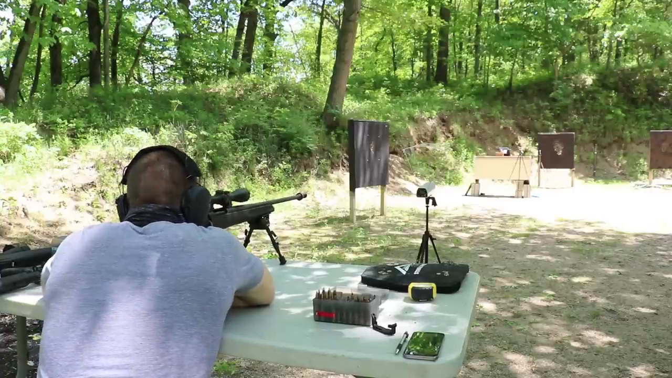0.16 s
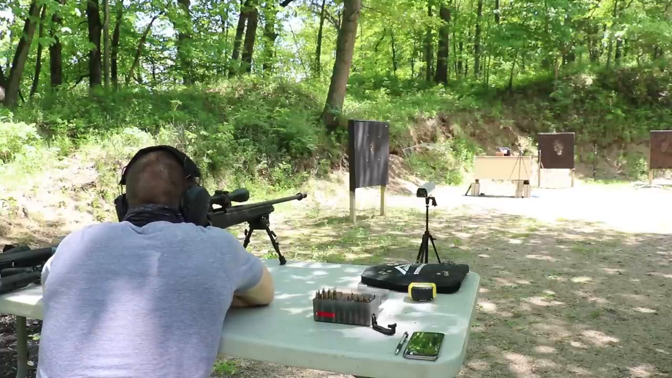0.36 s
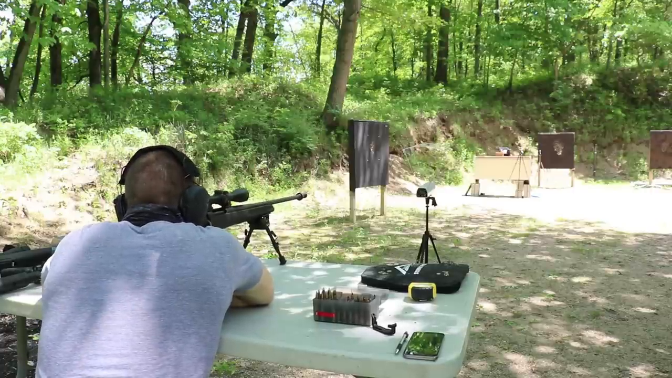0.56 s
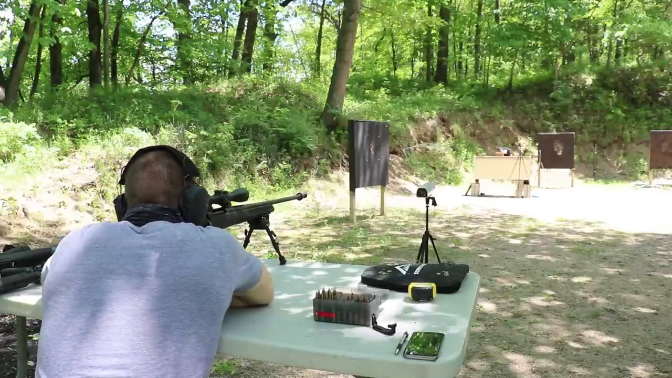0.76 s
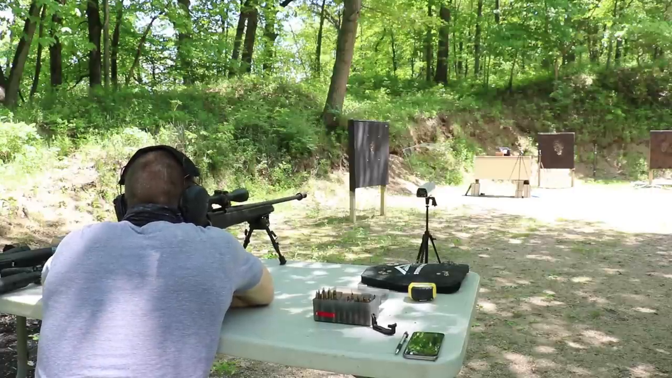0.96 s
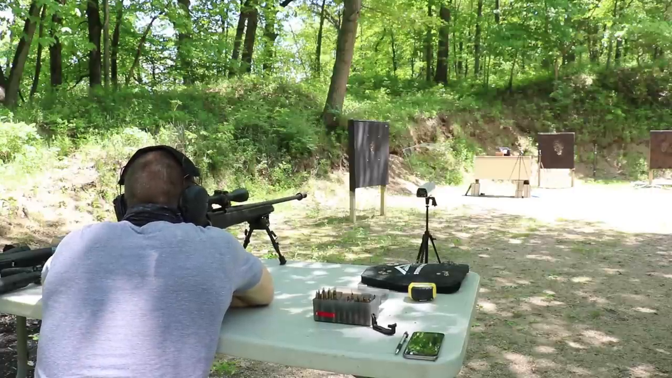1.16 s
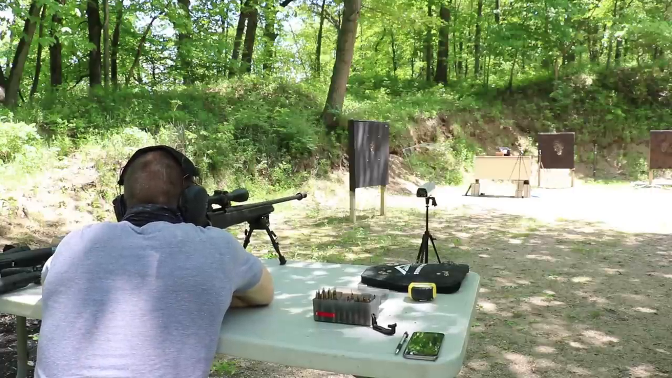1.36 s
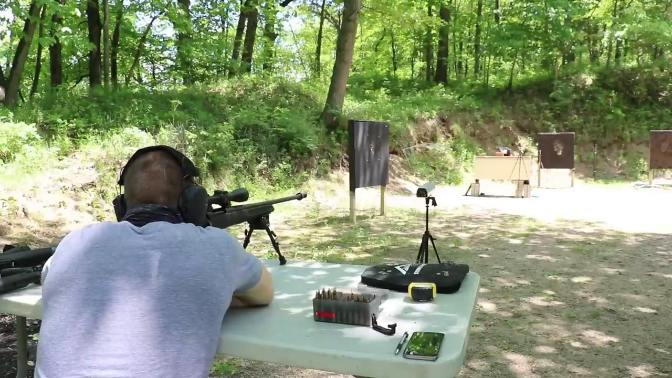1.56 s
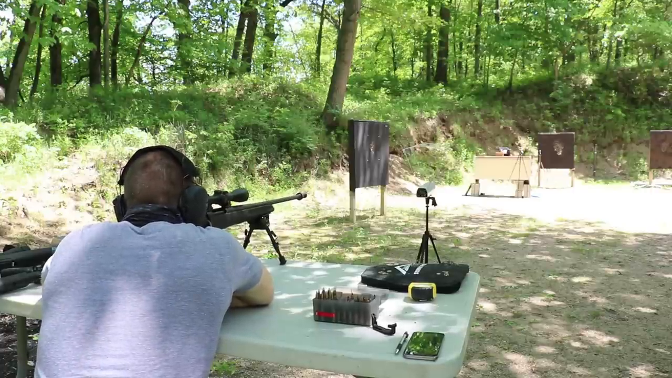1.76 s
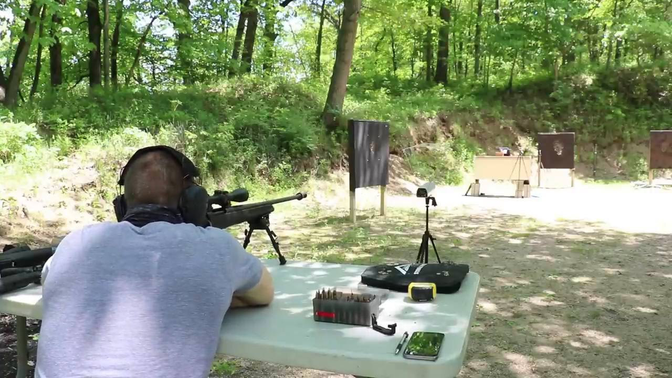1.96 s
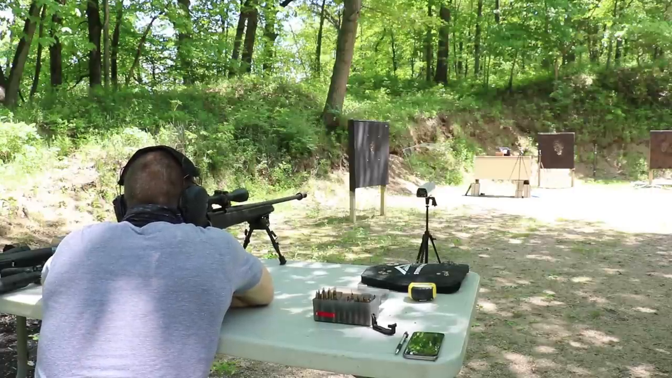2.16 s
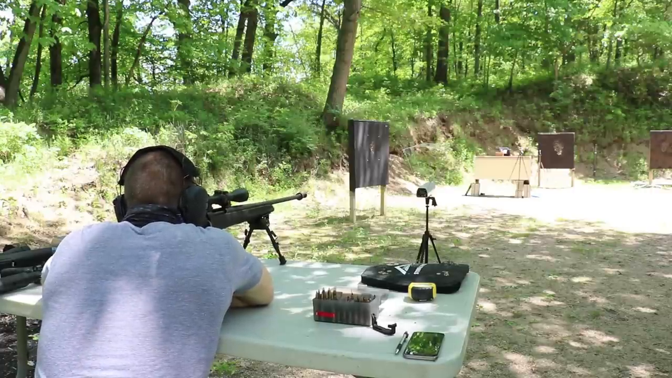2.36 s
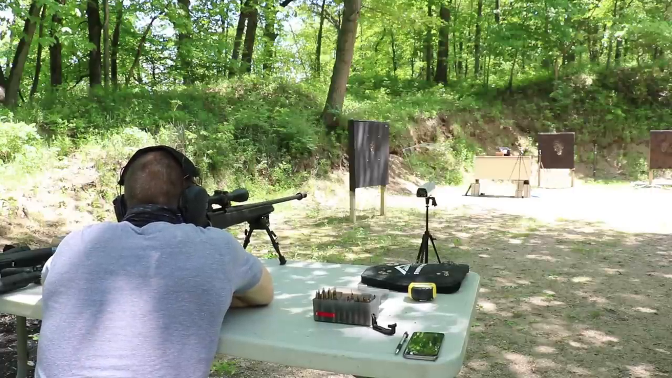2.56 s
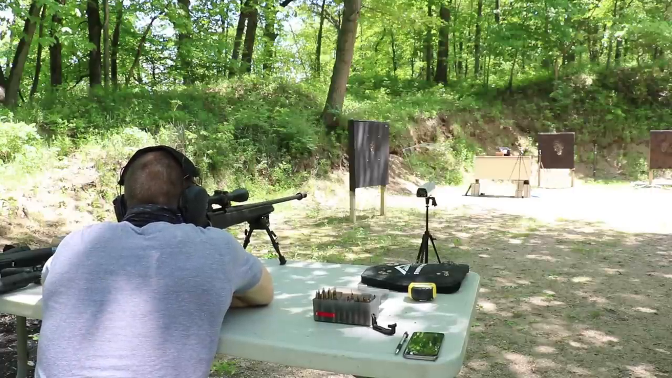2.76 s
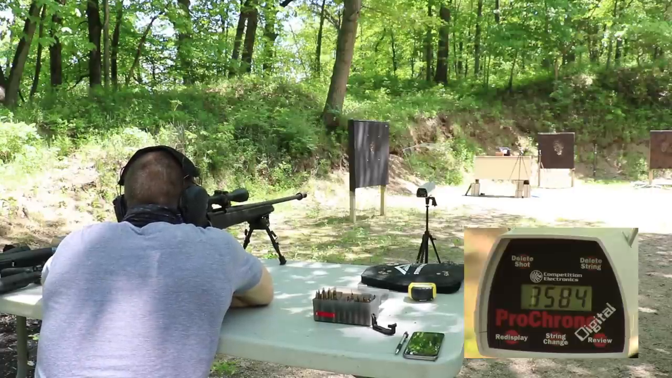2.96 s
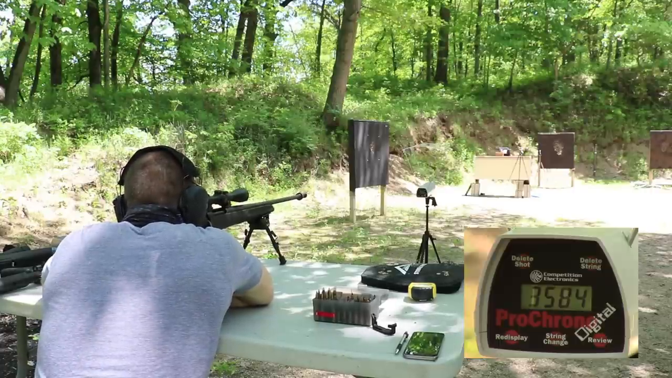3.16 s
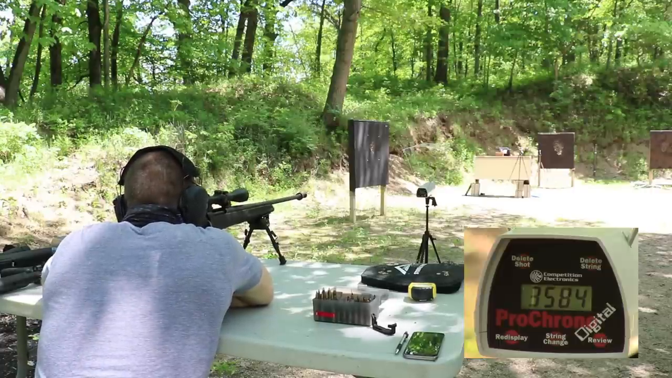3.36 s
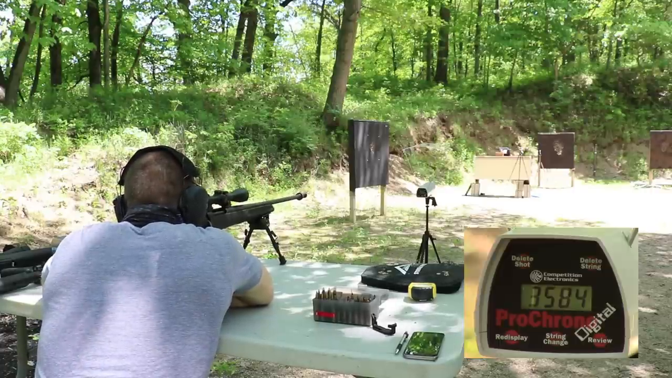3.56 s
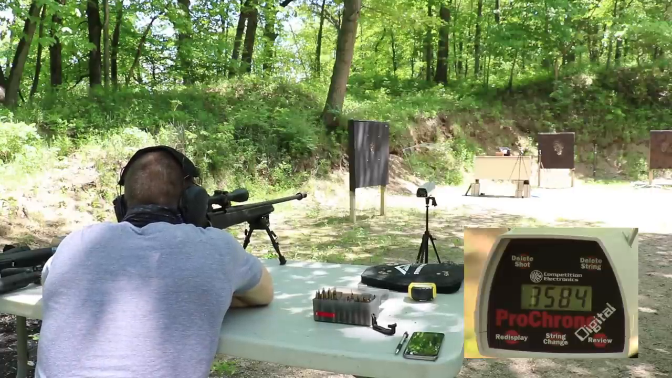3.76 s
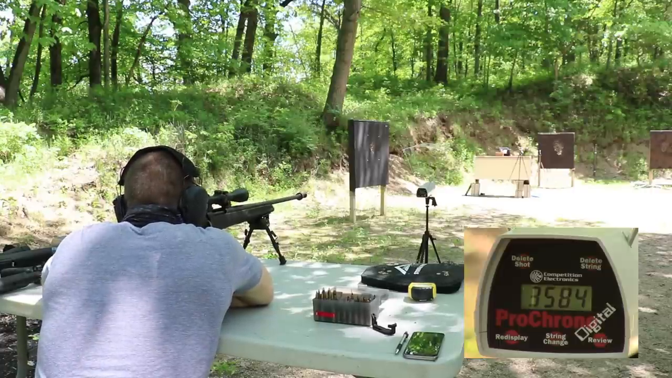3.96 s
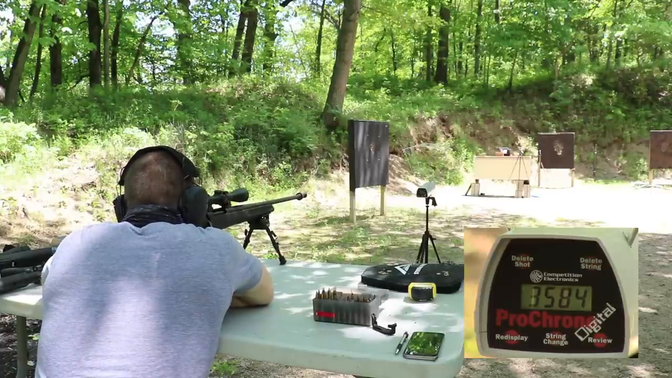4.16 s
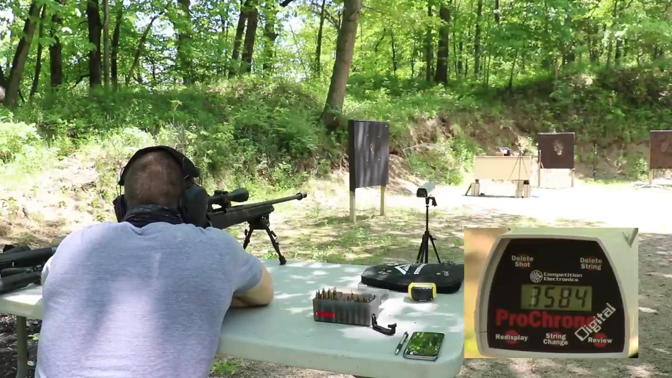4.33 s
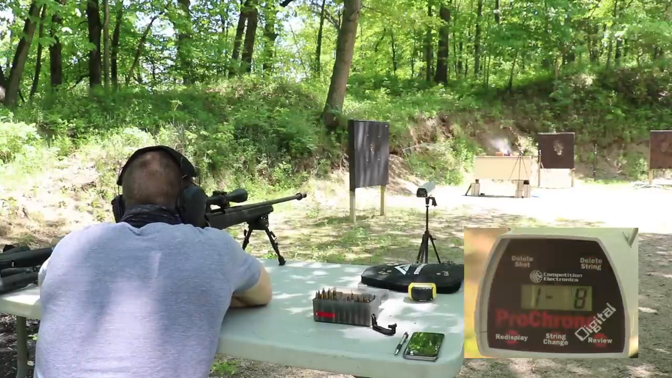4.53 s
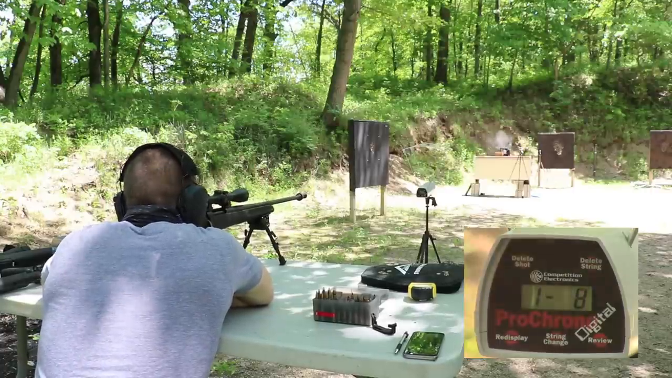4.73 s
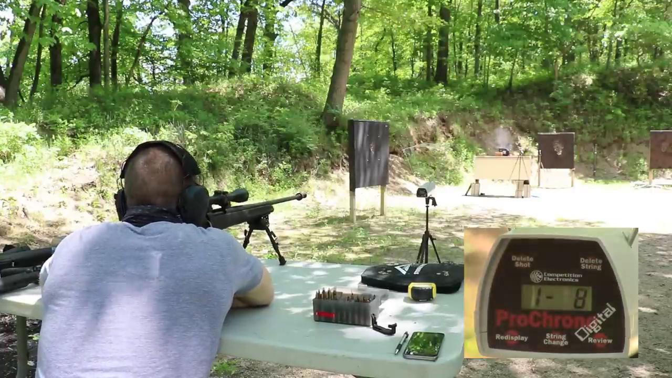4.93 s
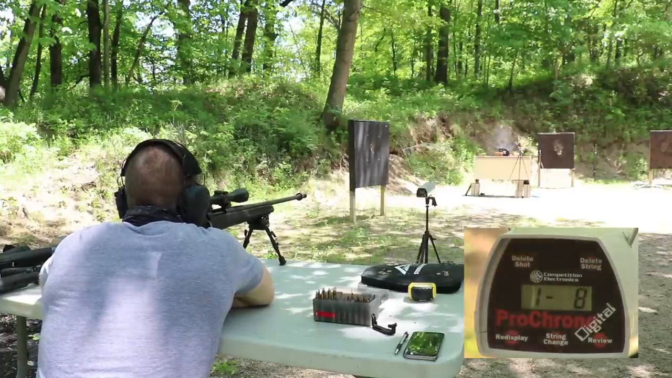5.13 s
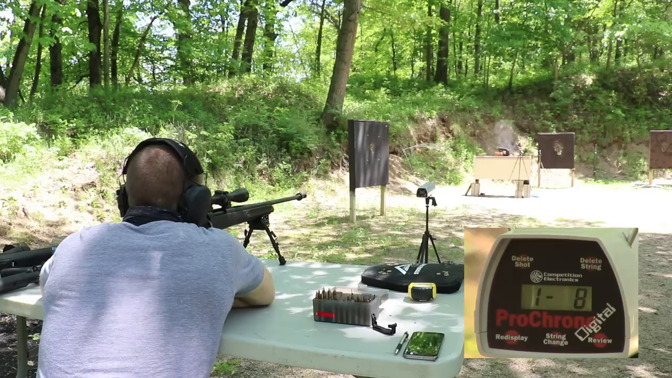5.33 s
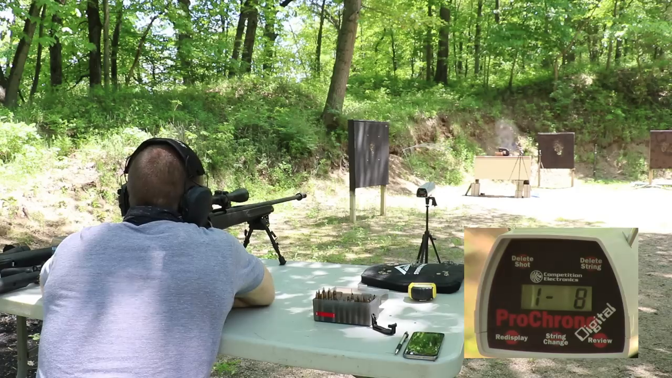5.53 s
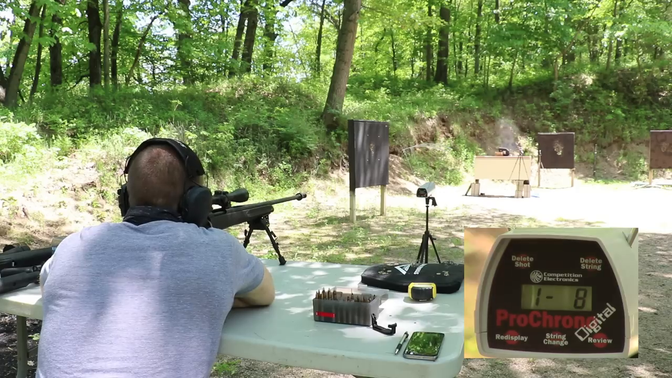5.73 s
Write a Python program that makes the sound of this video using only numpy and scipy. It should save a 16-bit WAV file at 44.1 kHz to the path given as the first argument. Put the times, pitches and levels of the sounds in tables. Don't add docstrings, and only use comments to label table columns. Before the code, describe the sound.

At a wooded outdoor range, faint songbirds whistle, buzz and chip above a low distant engine hum, soft leaves and hiss. After about four and a half seconds one rifle shot bursts out close to the microphone, distorted and clipped. Its echo rolls back from banks and trees, growing duller, with slight rustling and tiny ticks at the end.

```python
import sys
import numpy as np
from scipy import signal
from scipy.io import wavfile
from scipy.ndimage import uniform_filter1d

SR = 44100
rng = np.random.default_rng(int(sys.argv[2]) if len(sys.argv) > 2 else 0)


def attenuation_scalar(level_db):
    decades = np.asarray(level_db, float) / 20
    return 10 ** decades


def store_wav(level_fs):
    pcm = np.round(np.clip(np.atleast_2d(level_fs), -1, 1) * 32767)
    wavfile.write(sys.argv[1], SR, pcm.T.astype(np.int16))


N = 259837
BLAST_S = 0.0753

# frequency in Hz, left-right likeness [0-1].
SAME = [(30, .97), (90, 0.7), (180, 0.5), (550, 0.55), (1650, 0.6), (5000, 0.7), (15000, 0.35)]


def evened(x):
    return x / np.sqrt(np.mean(x ** 2) + 1e-20)


def read(points, hz):
    f, value = np.transpose(points)
    return np.interp(np.log(hz + 1), np.log(f + 1), value)


def steady(points):
    return lambda hz, t: read(points, hz) + 0 * t


def columns(rows, t):
    s, *values = np.transpose(rows)
    return [np.interp(t, s, v) for v in values]


def bumps(rows, t, width_s):
    return sum(db * np.exp(-((t - s) / width_s) ** 2) for s, db in rows)


def bell(t, at_s, width_s):
    return np.exp(-((t - at_s) / width_s) ** 2)


def add(mix, s, sound):
    part = mix[..., round(s * SR):][..., :sound.shape[-1]]
    part += sound[..., :part.shape[-1]]


def wander(count, hz):
    white = rng.standard_normal(4000 + (count // 20000 + 1) * 20000)
    slow = signal.lfilter(*signal.butter(2, hz, fs=SR), white[:count + 4000])
    return evened(slow[4000:])


def noise(field_db, same, size, patchy_db, band):
    # frequency in Hz, left minus right in dB.
    balance = [(30, 1.5), (60, 2.5), (180, 2.5), (550, 1), (1650, .3), (5000, .8), (15000, 0)]
    hop = size // 4
    frames, hz = N // hop + 5, np.fft.rfftfreq(size, 1 / SR)
    a, b, c, d, patches = rng.standard_normal((frames, len(hz), 5)).T
    patches = uniform_filter1d(patches, size=8, axis=0)
    patches = evened(uniform_filter1d(patches, size=10, axis=1))

    like = np.clip(read(same, hz), -1, 1)[:, None]
    left = a + 1j * b
    right = like * left + np.sqrt(1 - like ** 2) * (c + 1j * d)
    z = np.array([left, right])

    level_db = field_db(hz[:, None], np.arange(frames)[None] * hop / SR)
    power = attenuation_scalar(level_db) ** 2 * ((hz > band[0]) & (hz < band[1]))[:, None]
    lean_db = read(balance, hz)[:, None] * np.array([.5, -.5])[:, None, None]
    z *= attenuation_scalar(level_db + patchy_db * patches + lean_db)
    sound = signal.istft(z, nperseg=size, noverlap=size * 3 // 4)[1][:, :N]
    return sound / np.sqrt(power[:, 0].sum())


def air():
    # frequency in Hz, density in dB per Hz.
    hiss_colour = [(110, -16), (160, 4), (220, -3), (280, -9), (500, -11.5), (800, -10.5), (1000, -14),
                   (1300, -19.5), (2000, -25), (3200, -24.5), (5000, -26.5), (8000, -34.5), (11000, -42.5),
                   (16000, -44)]
    rumble_colour = [(15, -20), (25, 5.5), (45, -1.5), (65, 9.5), (110, 2.5), (140, 5), (170, -32.5)]
    hiss = noise(steady(hiss_colour), SAME, size=2048, patchy_db=0.7, band=(250, 1500))
    rumble = noise(steady(rumble_colour), SAME, size=4096, patchy_db=3.0, band=(20, 70))
    return attenuation_scalar(-52) * hiss + attenuation_scalar(-50) * rumble


def drone(rows, second_db, flutter):
    t = np.arange(N) / SR
    hz, db = columns(rows, t)
    turns = 2 * np.pi * np.cumsum(hz) / SR + flutter * wander(count=N, hz=43.8)
    tone = np.sin(turns) * (1 + flutter * wander(count=N, hz=12.0))
    tone = tone + attenuation_scalar(second_db) * np.sin(2 * turns)
    start_s = rows[0][0]
    start = np.clip((t - start_s) / .3 + (start_s < .1), 0, 1)
    return np.sqrt(2) * attenuation_scalar(db) * tone * start * attenuation_scalar([[1.5], [-1.5]])


def engines():
    # time in seconds, firing rate in Hz, level in dB.
    near_engine = [(0.0, 94.2, -44), (0.16, 94.7, -36.5), (0.29, 92, -37), (0.54, 89.1, -43),
                   (0.62, 89.3, -38), (2.1, 89.38, -36.5), (2.57, 90.8, -39), (3.44, 90.56, -34),
                   (3.71, 89.2, -35), (3.74, 91.25, -32), (4.18, 92.85, -34.5), (4.52, 94.3, -32.5)]
    far_engine = [(2.9, 125.5, -52), (2.984, 123.5, -63), (3.042, 124.1, -43), (3.21, 125.4, -46.5),
                  (4.062, 127.3, -49), (4.16, 120.4, -45), (4.326, 127.9, -49), (4.5, 126.8, -52)]
    # time in seconds, lift or dip in dB.
    gusts = [(.14, -12), (.19, -19), (.38, -16), (.53, -12), (.58, -7), (1.12, 1), (1.66, -9), (2.15, -6.5),
             (2.32, -4), (2.63, -11), (3.05, -13), (3.26, -1)]
    fade = attenuation_scalar(bumps(gusts, np.arange(N) / SR, width_s=0.011))
    near = drone(near_engine, second_db=-26.5, flutter=0.16) * fade
    return near + drone(far_engine, second_db=-39.0, flutter=0.2)


def note(length, start_hz, end_hz, db, waver_hz, pace_hz, throb):
    count = round(length * SR)
    pace = pace_hz * (1 + .35 * wander(count=count, hz=91.7))
    trill = np.sin(2 * np.pi * (np.cumsum(pace) / SR + rng.random()))
    hz = np.linspace(start_hz, end_hz, count) + waver_hz * trill
    level = attenuation_scalar(db) * (1 + throb * wander(count=count, hz=73.4)) * signal.windows.tukey(count, .3)
    return np.sqrt(2) * level * np.sin(2 * np.pi * np.cumsum(hz) / SR)


def whistles():
    # start in seconds, length in seconds, pitch in Hz, level in dB.
    held_notes = [ (0, 0.03, 2565, -56), (0.2, .05, 2550, -62), (3.17, .05, 2600, -60), (3, .07, 4480, -64),
                  (0.96, 0.2, 3430, -62.5), (1.36, 0.1, 3480, -58.5), (1.909, .03, 3700, -52),
                  (1.925, 0.032, 3450, -57), (1.95, 0.078, 3750, -57), (2.13, 0.027, 3600, -55.5),
                  (1.19, 0.037, 3500, -61), (3.135, .03, 4900, -59), (3.545, 0.013, 4500, -64),
                  (2.909, 0.048, 3650, -58), (2.953, 0.06, 3440, -58), (.85, 0.079, 4150, -61),
                  (3.271, 0.097, 2610, -65), (3.69, 0.041, 4480, -59.5)]
    out = np.zeros(N)
    for s, length, hz, db in held_notes:
        add(out, s, note(length, hz, hz, db, waver_hz=.011 * hz, pace_hz=55., throb=.25))
    return out


def buzzes():
    # start in seconds, length in seconds, pitch in Hz, level in dB.
    buzzy_notes = [ (0, .11, 6160, -54), (0.091, 0.17, 3340, -58), (0.218, 0.091, 4750, -50),
                   (0.286, 0.14, 6105, -54), (0.441, 0.2, 3675, -60.5), (0.528, 0.14, 5500, -54),
                   (0.547, 0.18, 6590, -56), (0.68, 0.27, 3560, -59), (0.804, 0.12, 5830, -52.5),
                   (0.968, 0.11, 4270, -52), (1.048, 0.13, 6340, -54), (1.197, 0.15, 3930, -56),
                   (1.323, 0.067, 2695, -60), (1.338, 0.051, 6400, -49.5), (1.459, 0.074, 2680, -60),
                   (1.6, .12, 7050, -55.5), (1.77, 0.077, 3717, -56), (1.845, 0.32, 5830, -62),
                   (1.891, 0.082, 4640, -53), (2.037, 0.19, 6470, -57), (2.121, 0.099, 3720, -58),
                   (2.304, 0.16, 2690, -58), (2.332, 0.16, 3490, -59), (2.6, 0.042, 6560, -63),
                   (3.01, 0.15, 3120, -59.5), (3.002, 0.02, 4940, -52), (3.024, .02, 4940, -53),
                   (2.609, .04, 6400, -60), (3.269, 0.1, 2850, -55.5), (2.38, 0.066, 5400, -58),
                   (2.42, 0.11, 2950, -59), (0, 0.14, 4700, -63), (.03, .07, 2600, -57),
                   (3.03, 0.068, 3300, -62), (.69, 0.053, 3400, -59), (3.99, .035, 4500, -60),
                   (3.987, 0.041, 2600, -62), (0.82, 0.055, 6400, -54), (3.289, .11, 3315, -66),
                   (3.976, 0.14, 3020, -61), (3.72, .07, 4950, -60), (3.995, .03, 5600, -62),
                   (4.21, .08, 4900, -63), (3.5, .12, 6350, -67), (4.2, .08, 2700, -63),
                   (4.149, .12, 3995, -62)]
    sag = .0203
    out = np.zeros(N)
    for s, length, hz, db in buzzy_notes:
        waver_hz = 199 + .0797 * hz
        add(out, s, note(length, (1 + sag) * hz, (1 - sag) * hz, db, waver_hz, pace_hz=190.1, throb=.86))
    return out


def chips():
    # start in seconds, peak in dB, start pitch in Hz.
    sharp_chips = [
        (0.1935, -39.5, 10000),
        (0.856, -41, 9800),
        (1.4142, -40, 9300),
        (1.8812, -41.5, 9800),
        (2.361, -40, 12200),
        (2.997, -43, 10500),
        (3.7056, -43.5, 10300),
    ]
    chip_s, end_hz = .015, 4370
    out = np.zeros(N)
    for s, db, hz in sharp_chips:
        add(out, s - .002, note(chip_s, hz, end_hz, db - 5, waver_hz=90, pace_hz=600., throb=.15))
        add(out, s, note(chip_s, 1.6 * hz, 2 * end_hz, db - 18, waver_hz=300, pace_hz=600., throb=.15))
    return out


def glides():
    # start in seconds, length in seconds, start and end pitch in Hz, level in dB.
    pure_notes = [
        (.46, .085, 6780, 6600, -52),
        (.468, .075, 6950, 6980, -58),
        (.655, .1, 4225, 4190, -50),
        (1.68, .075, 4130, 4160, -58),
        (1.84, .1, 5420, 5380, -54),
        (2.17, .12, 4200, 4290, -61),
        (2.674, .04, 4380, 4560, -52),
        (2.706, .07, 4560, 4460, -51),
        (2.92, .07, 6900, 6760, -60),
        (3.092, .06, 2680, 2540, -55),
    ]
    out = np.zeros(N)
    for s, length, hz, end_hz, db in pure_notes:
        add(out, s, note(length, hz, end_hz, db, waver_hz=12., pace_hz=40., throb=.12))
    return out


def husks():
    # start in seconds, length in seconds, pitch in Hz, level in dB.
    husky_notes = [(.492, .08, 4850, -52), (.6, .06, 4870, -59), (.72, .13, 4880, -56),
                   (.999, .07, 4740, -51), (1.08, .08, 4730, -58), (1.272, .07, 4750, -52),
                   (1.35, .12, 4680, -60), (1.05, .1, 5720, -55), (.8, .035, 5480, -55),
                   (1.95, .15, 4620, -60), (3.24, .045, 3000, -54), (.84, .05, 2300, -64)]
    out = np.zeros(N)
    for s, length, hz, db in husky_notes:
        add(out, s, note(length, hz, hz, db, waver_hz=.017 * hz, pace_hz=110., throb=.55))
    return out


def rises():
    # start in seconds, held pitch in Hz, rise as share of it, held length in seconds, level in dB.
    rising_slurs = [
        (0.965, 4690, 0.17, 0.02, -56),
        (1.814, 5410, .24, 0.029, -48.5),
        (1.965, 5363, 0.09, 0.045, -50),
        (2.418, 4240, 0.07, 0.055, -50.5),
        (2.921, 8240, .07, .04, -67),
        (3.44, 8150, 0.12, 0.012, -62),
    ]
    out = np.zeros(N)
    for s, hz, rise, held, db in rising_slurs:
        slur_s = .012 + .1 * rise
        add(out, s, note(slur_s, (1 - rise) * hz, hz, db, waver_hz=35., pace_hz=55., throb=.25))
        add(out, s + .75 * slur_s, note(held, hz, hz, db - 1, waver_hz=35., pace_hz=55., throb=.25))
    return out


def seeps():
    # start in seconds, length in seconds, pitch in Hz, level in dB.
    thin_notes = [ (1.385, 0.24, 6100, -59), (1.547, 0.099, 7300, -58), (1.996, 0.11, 5360, -56),
                  (1.305, 0.048, 6820, -62), (1.342, .02, 7900, -62), (1.399, .04, 6250, -53),
                  (1.97, 0.17, 7100, -59.5), (2.925, 0.028, 5456, -62), (2.98, 0.22, 7050, -60),
                  (2.975, 0.27, 5900, -63), (3.43, 0.23, 6850, -59.5), (3.49, .05, 5850, -65),
                  (3.547, .09, 5920, -62.5), (2.06, .1, 6300, -60)]
    out = np.zeros(N)
    for s, length, hz, db in thin_notes:
        half = .5 * .0249 * hz * np.clip(length / .09 - 1, -.5, 1.5)
        waver_hz = (.0088 + .044 * length) * hz
        add(out, s, note(length, hz - half, hz + half, db, waver_hz, pace_hz=55., throb=.3))
    return out


def falls():
    # start in seconds, length in seconds, start and end pitch in Hz, level in dB.
    falling_slurs = [(1.374, 0.026, 6150, 4750, -49), (1.634, 0.024, 6050, 4650, -48),
                     (1.6, .035, 8250, 7000, -56), (1.568, .025, 7050, 6700, -54),
                     (2.04, 0.05, 6550, 5600, -50), (2.1, .03, 4500, 3700, -58),
                     (2.603, 0.045, 7250, 6000, -55), (2.665, 0.018, 6200, 4800, -66),
                     (3.12, .016, 6200, 4900, -55), (3.372, 0.016, 6360, 4900, -57),
                     (3.83, .045, 4650, 4150, -63), (3.87, 0.05, 4200, 3250, -59),
                     (3.385, 0.014, 5000, 3900, -60), (3.95, 0.05, 3350, 2650, -62),
                     (4.125, 0.055, 3450, 2560, -60), (4.25, 0.036, 4900, 3650, -63)]
    out = np.zeros(N)
    for s, length, hz, end_hz, db in falling_slurs:
        add(out, s, note(length, hz, end_hz, db + 1.5, waver_hz=.011 * hz, pace_hz=70., throb=.4))
    return out


def woods(x):
    # frequency in Hz, time to decay by 60 dB in seconds.
    decay = [(1000, 0.26), (4000, 0.78), (7000, 0.79), (11000, 0.19), (15000, 0.17)]
    taps = np.zeros((2, SR))
    at = np.arange(40, SR - 20, 20) + rng.integers(0, 20, (2, (SR - 41) // 20))
    np.put_along_axis(taps, at, rng.choice([-1., 1.], at.shape), 1)
    hz, t, z = signal.stft(taps, SR, nperseg=256)
    tail = signal.istft(z * attenuation_scalar(-60 * t / read(decay, hz)[:, None]), SR, nperseg=256)[1]
    tail = tail + .3 * tail[::-1]
    return signal.fftconvolve(x[None], tail / np.linalg.norm(tail[0]), axes=1)[:, :N]


def birds():
    clear = whistles() + glides() + husks() + rises() + seeps() + falls()
    buzzy, sharp = buzzes(), chips()
    straight = clear * attenuation_scalar([[-1.5], [-3]]) + buzzy * attenuation_scalar([[-6], [-7.5]]) + sharp * attenuation_scalar([[-13], [-14]])
    return straight + woods(attenuation_scalar(-8.5) * clear + attenuation_scalar(-6.5) * buzzy + attenuation_scalar(0.5) * sharp)


def overload(u):
    hz = 400 + 20 * u / BLAST_S
    hz = hz + 190 * bell(u, .021, .011)
    hz = hz + 650 * bell(u, .031, .005)
    flutter = 1.3 * (1 - .7 * np.exp(-u / .008)) * np.clip(1 - (u / .048) ** 2, .35, 1)
    hiss = 2.2 * np.exp(-(u / .0039) ** 1.5) + .03 + 7. * u
    swing = -.7 * np.sin(2 * np.pi * (u / BLAST_S) ** .78)
    release = np.clip(1 - (BLAST_S - u) / .02, 0, 1)
    ceiling_db = -7 - 21 * (1 - np.exp(-u / .038)) - 10 * release
    return hz, flutter, hiss, swing, ceiling_db


def blast():
    shot_s = 4.5447
    t = np.arange(0, BLAST_S, 1 / SR)
    count = len(t)
    hz, flutter, hiss, swing, ceiling_db = overload(t)

    slap = np.cos(2 * np.pi * (np.cumsum(hz) / SR - .4) + .5 * wander(count=count, hz=205.5))
    stray = signal.lfilter(*signal.butter(1, 600., "high", fs=SR), wander(count=count, hz=1240.0))
    sides = np.array([wander(count=count, hz=1200.) for _ in range(2)])
    slap = slap + .75 * evened(stray) + .25 * wander(count=count, hz=230.) + .3 * sides

    shared, left, right = (wander(count=count, hz=10000.) for _ in range(3))
    crack = .8 * shared + .42 * np.array([left, right])
    slam = 2.2 * np.cos(2 * np.pi * 1120 * (t - .0025)) * bell(t, .0025, .0016)
    thud = .8 * np.sin(2 * np.pi * 200 * (t - .0035)) * bell(t, .0043, .0028)
    pressure = flutter * slap + swing - slam - thud + hiss * crack
    squared = np.tanh(1.9 * pressure) + .045 * crack

    out = np.zeros((2, N))
    add(out, shot_s, attenuation_scalar(ceiling_db) * squared * signal.windows.tukey(count, .01))
    rise = np.arange(-90, 0) / SR
    rush = signal.windows.tukey(len(rise), .3) * (1 + .6 * wander(count=len(rise), hz=6000.))
    add(out, shot_s + rise[0], attenuation_scalar(-20 + 12000 * rise) * rush)
    return signal.lfilter(*signal.butter(2, 100., "high", fs=SR), out)


def echo():
    # time in seconds, level in dB.
    levels = [(4.6, -25), (4.645, -22.5), (4.7, -23.5), (4.82, -26), (4.92, -27), (5.0, -26.5), (5.3, -27),
              (5.51, -31), (5.89, -34.5)]
    # frequency in Hz, density in dB per Hz.
    first_colour = [(140, -33), (230, -10), (340, -4), (655, -4), (969, -3.5), (1180, -6), (1870, -7.5),
                    (2480, -10.5), (2910, -10.5), (8750, -17), (16000, -26.5)]
    boom_colour = [(60, -28), (110, -3.5), (160, -4), (220, 3.5), (290, -7), (400, -16), (800, -63)]
    # frequency in Hz, loss in dB per second (0.4-1.5 kHz as reference).
    travel_loss = [(200, -3.5), (500, -3), (1000, 1), (2000, 5.5), (4000, 17), (8000, 37.5), (12000, 65),
                   (16000, 137)]
    # frequency in Hz, left-right likeness [0-1].
    width = [(60, 0.76), (180, 0.77), (550, 0.64), (1650, 0.75), (4970, 0.54), (15000, 0.1396)]
    # time in seconds, lift over the echo in dB.
    banks = [
        (4.832, 3),
        (4.932, -4),
        (5.243, 0.5),
    ]
    # time in seconds, lift over the steady boom in dB.
    rolls = [
        (4.99, 5),
        (5.125, 12),
        (5.21, 9.5),
        (5.285, 9.5),
        (5.42, 9),
        (5.55, 12),
        (5.64, 9.5),
        (5.75, 10),
        (5.82, 9),
        (5.89, 13),
    ]
    limit = attenuation_scalar(-9.5)

    def field_db(hz, t):
        travel_s = np.clip(t - 4.65, 0, 2)
        return read(first_colour, hz) - read(travel_loss, hz) * travel_s

    t = np.arange(N) / SR
    returns = noise(field_db, width, size=512, patchy_db=0.66, band=(400, 1500))
    boom = noise(steady(boom_colour), width, size=2048, patchy_db=0.5, band=(140, 280))
    slaps = attenuation_scalar(0.54 * wander(count=N, hz=60.5))
    both = attenuation_scalar(columns(levels, t)[0] + bumps(banks, t, width_s=.0085) + 2.3) * slaps * returns
    both = both + attenuation_scalar(-40.55 + bumps(rolls, t, width_s=.046)) * boom
    return np.clip((t - 4.575) / 0.018, 0, 1) * limit * np.tanh(both / limit)


def rustle():
    # time in seconds, level at 9-15 kHz in dB, dullness above 10 kHz in dB.
    hiss_curve = [(5.0, -87, 22), (5.14, -54.5, 22), (5.26, -55.5, 13), (5.36, -60.5, 0), (5.45, -61, 4),
                  (5.58, -69.5, 2), (5.75, -68.5, .1), (5.89, -60, 10)]
    # frequency in Hz, density in dB per Hz.
    hiss_colour = [(3000, 4), (6000, 4.5), (10000, 5), (13000, 2.5), (16000, -11)]

    def field_db(hz, t):
        dull_db = columns(hiss_curve, t)[1] * (t > 4)
        return read(hiss_colour, hz) - dull_db * np.clip((hz - 10200) / 1500, 0, 1)

    t = np.arange(N) / SR
    fine = noise(field_db, SAME, size=256, patchy_db=2.5, band=(9000, 15000))
    return attenuation_scalar(columns(hiss_curve, t)[0]) * np.clip((t - 4.95) / 0.097, 0, 1) * fine


def ticks():
    # time in seconds, peak in dB, ring in Hz, left minus right in dB.
    grit = [
        (5.193, -50, 10800, 0),
        (5.2744, -40, 7640, 5),
        (5.7338, -46, 8360, -0.5),
        (5.7847, -46, 7790, 1.0),
        (5.8074, -41, 8330, 0.0),
        (5.8466, -40, 8660, -1.0),
        (5.8554, -45, 8390, 15),
        (5.8654, -47, 7010, -0.5),
        (5.8784, -49, 7120, 0.0),
    ]
    out, t = np.zeros((2, N)), np.arange(120) / SR
    for s, db, hz, pan_db in grit:
        ring = .6 * np.sin(2 * np.pi * hz * t) + .6 * np.diff(rng.standard_normal(len(t) + 1))
        soft = np.clip(t / .0002, 0, 1)
        decay = attenuation_scalar(db + 4.0 - 60 * t / 0.0036)
        add(out, s, decay * soft * ring * attenuation_scalar([[pan_db / 2], [-pan_db / 2]]))
    return out


def scene():
    # time in seconds, gain in dB.
    gain = [
        (0, 2),
        (4.545, 0.5),
        (4.6, -14),
        (4.75, -20),
        (5.0, -36),
        (5.25, -14),
        (5.55, -22),
        (5.89, -12.5),
    ]
    background = air() + engines() + birds()
    shot = blast() + echo() + rustle() + ticks()
    return background * attenuation_scalar(columns(gain, np.arange(N) / SR)[0]) + shot


def drop_treble(x):
    # start in seconds, length in seconds, edge in Hz, change in dB.
    treble_cuts = [(4.86, .075, 15200, -20), (4.935, .025, 13100, -30), (4.96, .12, 14300, -30),
                   (5.08, .045, 14900, -30), (5.125, .115, 15000, -30), (5.125, .06, 10300, -4),
                   (5.205, .06, 10300, -5), (5.285, .06, 10300, -3), (5.12, .03, 13200, -8),
                   (5.21, .03, 12500, -10), (5.345, .058, 13300, -40), (5.4, .025, 13300, -8)]
    hz, t, z = signal.stft(x, SR, nperseg=512, noverlap=384)
    cut_db = sum(db * (hz[:, None] > edge) * (t > s) * (t < s + length) for s, length, edge, db in treble_cuts)
    return signal.istft(z * attenuation_scalar(cut_db), SR, nperseg=512, noverlap=384)[1][:, :N]


def roll_off(x):
    return signal.sosfilt(signal.butter(12, 16940, fs=SR, output="sos"), x)


def record(dry):
    lowpass = signal.firwin(511, 15760, window=("kaiser", 7), fs=SR)
    limited = signal.oaconvolve(drop_treble(dry), lowpass[None], "same")
    return roll_off(limited)


dry = scene()
out = record(dry)
store_wav(out)
```